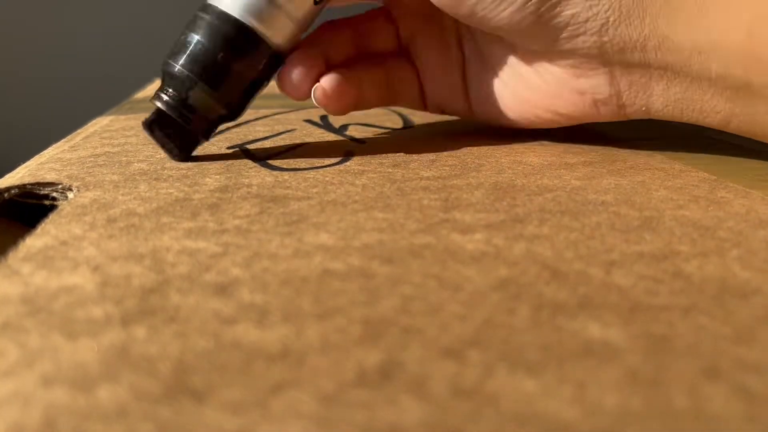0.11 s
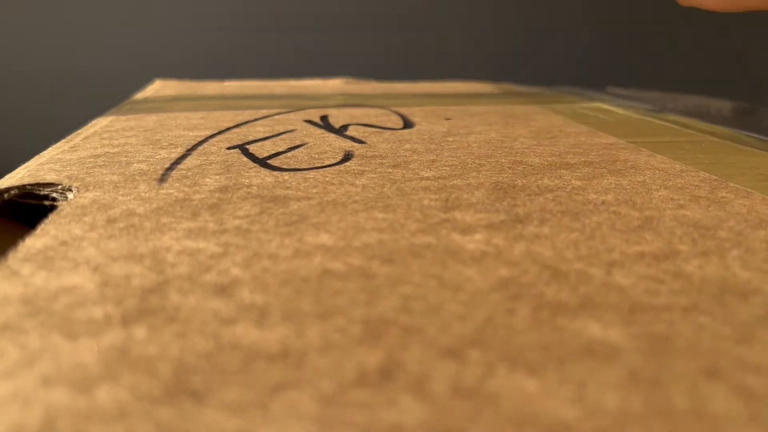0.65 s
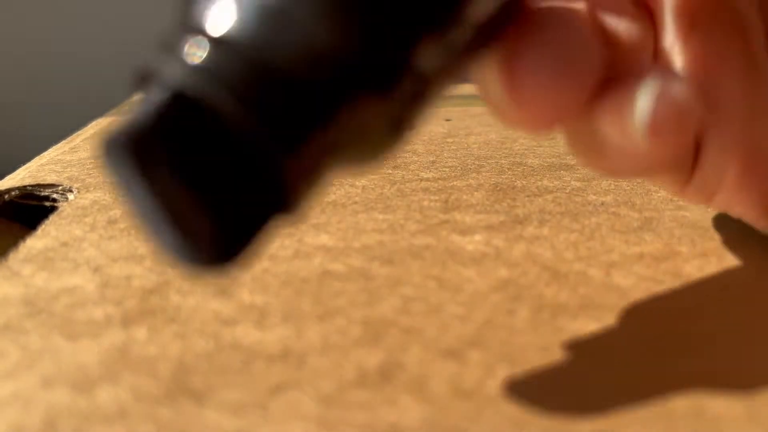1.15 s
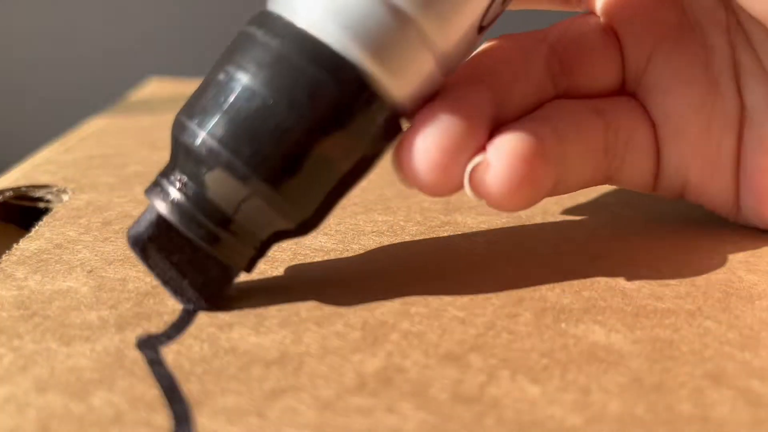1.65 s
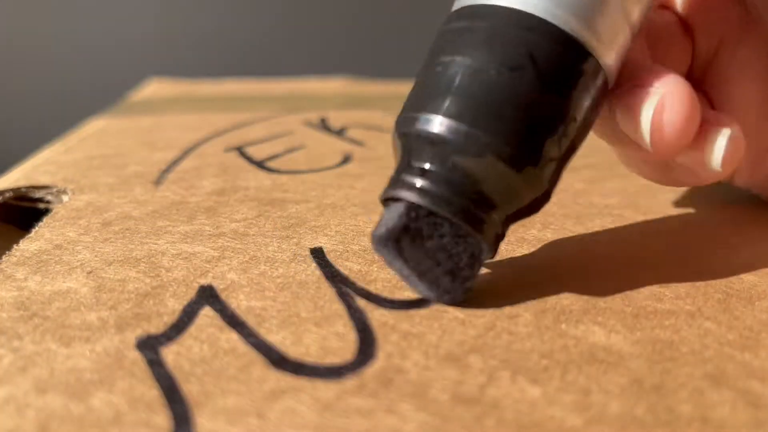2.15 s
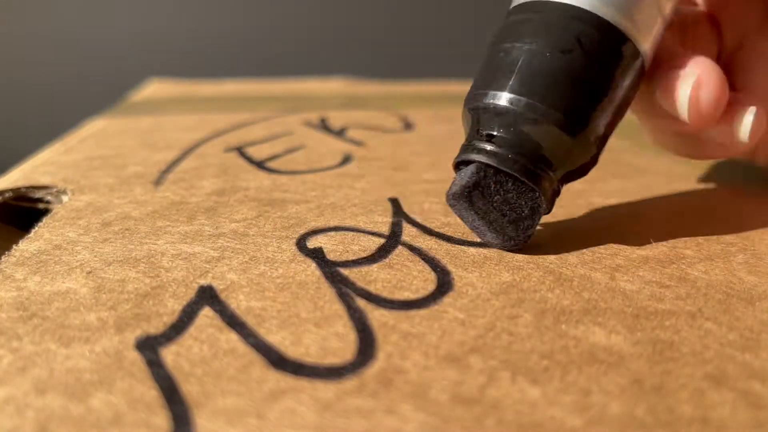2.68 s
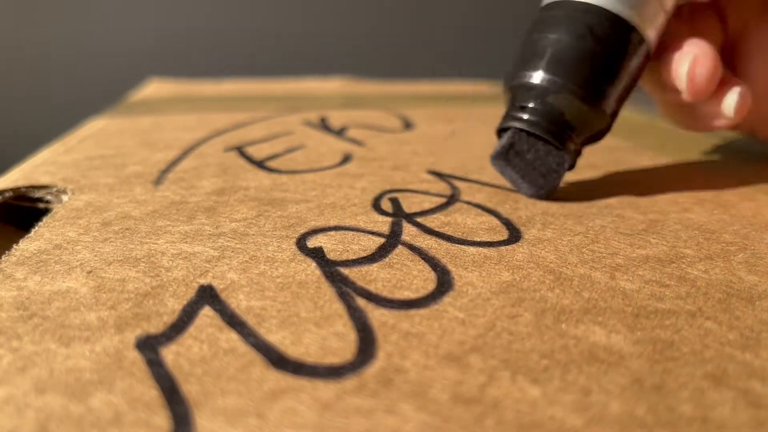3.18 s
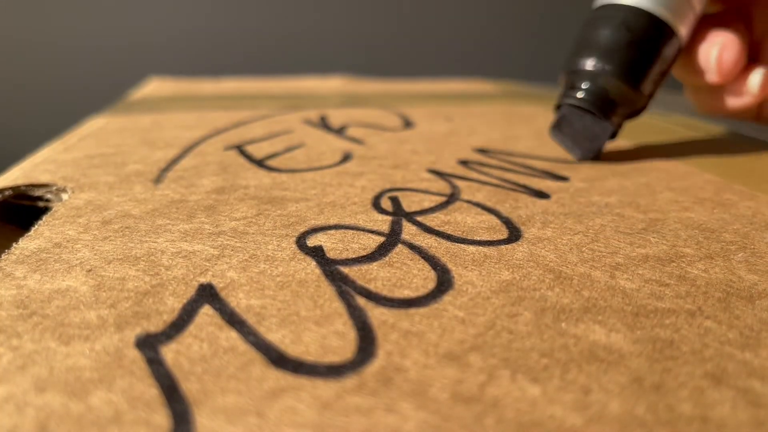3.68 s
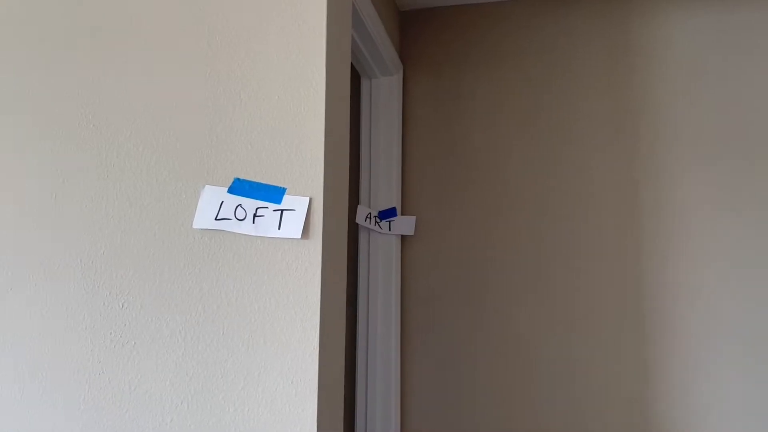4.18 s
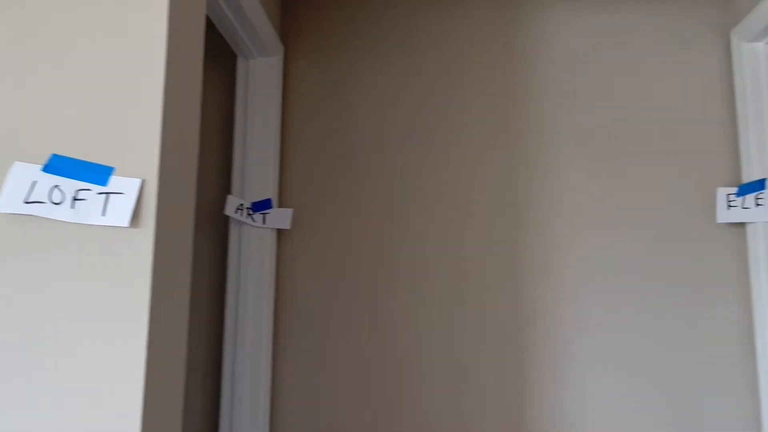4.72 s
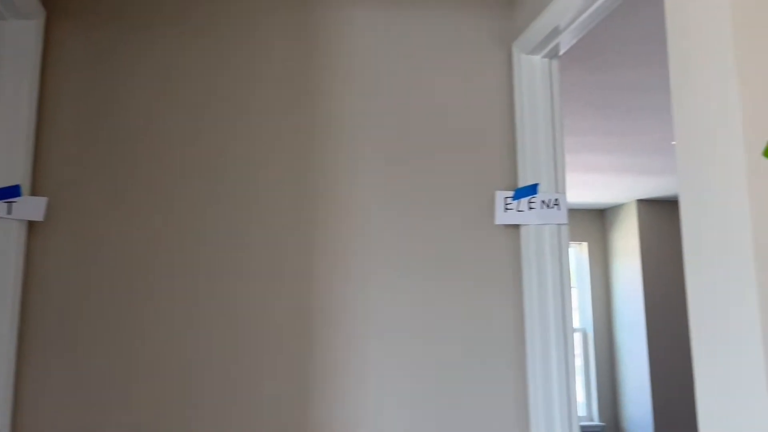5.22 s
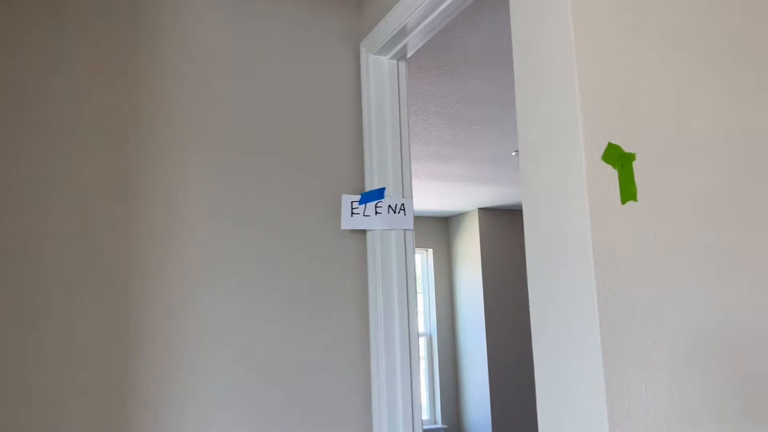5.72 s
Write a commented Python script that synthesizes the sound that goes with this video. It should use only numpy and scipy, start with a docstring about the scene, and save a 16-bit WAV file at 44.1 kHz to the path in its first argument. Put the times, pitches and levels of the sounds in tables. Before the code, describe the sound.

Close stereo pickup beside a hollow cardboard box, with low ventilation rumble and faint drones beneath. At 0.06-0.2 s a fast felt-marker swipe hisses, with a low buzz over the corrugation. A light tap at 0.44 leads to the loudest event, a double, boomy knock with plastic clicks at about 0.52. Soft hand brushes and tiny ticks fill 0.6-1.25. At 1.27 the tip lands with a solid thud, then writes until 3.7: dry, grainy, fibrous strokes of changing pressure, strongest around 1.44, 1.75-1.95 and 2.1, with low panel bumps near 1.74, 2.04, 2.57 and 3.11. Rasp gets thinner and brighter as the tip moves away; short buzzes return around 3.3-3.55. Everything fades by 3.8. A quiet empty room follows, with two faint clicks near 4.7. At about 5.2 a distant, muffled thump swells softly, lingers and decays through the end at about 5.85.

```python
"""In a room with ventilation rumble and drones, a broad felt marker writes on a corrugated cardboard box beside two ports.
The felt's drag is shaped noise that also shakes the panel; little contacts are noise bursts through the barrel's modes;
the tip's buzz over the flutes is a few harmonics at the crossing rate; its landings are falling sweeps on the panel.
The sound fades out; then, in a quiet empty room, two faint clicks use the contacts' noise bursts again,
and a distant thump swells and dies away as four bands of noise."""
import sys
import numpy as np
from scipy import signal
from scipy.fft import rfft, irfft, next_fast_len
from scipy.io import wavfile
from scipy.ndimage import uniform_filter1d, map_coordinates

SR = 44100
rng = np.random.default_rng(int(sys.argv[2]) if len(sys.argv) > 2 else 0)


def natural_amplitude(level_db):
    """Convert a level in decibels to a linear amplitude factor, elementwise."""
    exponent = np.asarray(level_db, float) / 20
    return 10 ** exponent


def wav_out(sig):
    """Save sig, one row per channel (or a flat mono array), as 16-bit PCM at SR to the path in sys.argv[1]."""
    wavfile.write(sys.argv[1], SR, np.round(np.clip(np.atleast_2d(sig).T, -1, 1) * 32767).astype(np.int16))


N = 257984

# Modes of the cardboard panel. Each row: centre in Hz, width in Hz, relative level in dB.
PANEL_MODES = [(92, 84, -6.5), (124, 32, -9), (275, 70.7, -6.5), (383, 160, -7.5), (514.4, 211, -13.5)]
# Air of the two rooms. Each row: time in seconds, first room's level in dB, second room's level in dB.
AIR_LEVELS = [(0, -34, -120), (3.66, -38, -120), (3.74, -52.5, -120), (3.79, -63, -120), (3.797, -120, -74),
              (3.815, -120, -51.5), (5.85, -120, -54)]
# Left-right likeness of near sounds, then of far ones. Each row: frequency in Hz, likeness (1 alike, -1 opposed).
NEAR_LIKENESS = [(60, 0.91), (300, .85), (700, 0.53), (1500, 0.33), (2300, 1), (3600, 0.6), (5000, 0.63),
                 (6500, 0.23)]
FAR_LIKENESS = [(60, 0.98), (300, 0.74), (600, -0.17), (1500, -0.17), (3000, 0.43), (6500, 0.77)]
FIRM_DB = -40.5  # stroke level that counts as firm


def unit(x):
    """Scales to rms 1."""
    return x / np.sqrt(np.mean(x ** 2) + 1e-20)


def along(points, hz):
    """Reads (Hz, value) points on a log frequency axis."""
    f, v = np.transpose(points)
    return np.interp(np.log(hz + 1), np.log(f + 1), v)


def curves(rows):
    """One value per sample for each column after the time."""
    s, *cols = np.transpose(rows)
    return [np.interp(np.arange(N) / SR, s, c) for c in cols]


def wobble(rate):
    """A smooth random curve, rate knots a second."""
    return map_coordinates(rng.standard_normal(int(N * rate / SR) + 4), [np.arange(N) * rate / SR])


def filtered(x, response):
    """Filters x by a complex response of frequency."""
    m = next_fast_len(N + SR // 2)
    return irfft(rfft(x, m) * response(np.fft.rfftfreq(m, 1 / SR)), m)[..., :N]


def resonances(modes):
    """Causal response of (Hz, width, dB) modes, alternating in sign."""
    def response(f):
        total = 0
        for k, (centre, width, db) in enumerate(modes):
            damping = 1j * f * width
            total = total + (-1) ** k * natural_amplitude(db) * damping / (centre * centre - f * f + damping)
        return total
    return response


def twice(modes):
    """The resonances applied twice, for steeper skirts."""
    return lambda hz: resonances(modes)(hz) ** 2


def colour(spectrum):
    """Gain of (Hz, dB) points."""
    return lambda hz: natural_amplitude(along(spectrum, hz))


def rush(response, alike, patchy_db, grain_db=0, lasting_db=0):
    """Stereo noise of rms 1: grainy, with brief wide patches of random gain and narrow lasting ones."""
    # Bands of the treble in which left and right noise become fully alike. Each row: frequency in Hz, likeness.
    alike_bands = [(7600, 1), (9100, 1), (9800, .8), (10900, 1), (13000, 1), (13800, .7), (14500, 1)]
    raw = rng.standard_normal((2, N)) * natural_amplitude(grain_db * wobble(1500))
    z = signal.stft(raw, nperseg=512)[2]

    def field(high, long):
        tall = uniform_filter1d(rng.standard_normal(z.shape[1:]), size=high, axis=0)
        return unit(uniform_filter1d(tall, size=long, axis=1))

    gain_db = patchy_db * field(high=6, long=10) + lasting_db * field(high=2, long=36)
    pair = signal.istft(z * natural_amplitude(gain_db), nperseg=512)[1][:, :N]

    def mid_side(hz):
        angle = np.arccos(np.clip(along(alike + alike_bands, hz), -1, 1)) / 2
        return response(hz) * [np.cos(angle), np.sin(angle)]

    mid, side = filtered(pair, mid_side)
    return unit(np.array([mid + side, mid - side]))


def stroke_gain():
    """The felt's drag on the card, stroke by stroke."""
    # One table a stroke. Each row: time in seconds, level in dB before the layer trims.
    strokes = [
        [(0.056, -58), (0.072, -37), (0.164, -39), (0.188, -60), (0.2, -56)],
        [(1.29, -61), (1.316, -44), (1.352, -44.5), (1.442, -33.5), (1.46, -41), (1.48, -34.5), (1.51, -58)],
        [(1.51, -57), (1.534, -59), (1.546, -47), (1.588, -48), (1.608, -39), (1.698, -45.5), (1.712, -59.5)],
        [(1.712, -60), (1.726, -64), (1.738, -41), (1.76, -35), (1.864, -39.5), (1.9, -35.5), (1.97, -39.5),
         (1.995, -56)],
        [(1.995, -59), (2.027, -66.5), (2.045, -41), (2.089, -35.5), (2.113, -44.5), (2.155, -42.5),
         (2.163, -36.5), (2.3, -42.5)],
        [(2.3, -40), (2.416, -40.5), (2.422, -36.5), (2.508, -43), (2.545, -52)],
        [(2.545, -52.5), (2.565, -53), (2.585, -44), (2.623, -37.5), (2.701, -43), (2.823, -42), (2.839, -39.5),
         (2.9, -43)],
        [(2.9, -39), (2.912, -45), (2.968, -40), (2.978, -44), (3.074, -44), (3.095, -66)],
        [(3.095, -66.5), (3.113, -42), (3.121, -39.5), (3.207, -43), (3.225, -61.5)],
        [(3.225, -58), (3.239, -46.5), (3.267, -38), (3.329, -41.5), (3.36, -52)],
        [(3.36, -52.5), (3.38, -40), (3.408, -39.5), (3.452, -55), (3.455, -50.5)],
        [(3.455, -52.5), (3.485, -41.5), (3.555, -47), (3.565, -54), (3.58, -51.5)],
        [(3.58, -51), (3.598, -45.5), (3.636, -50), (3.672, -59.5), (3.69, -53.5), (3.708, -55), (3.762, -90),
         (3.79, -90)],
    ]
    t = np.arange(N) / SR
    total = sum((t >= rows[0][0]) * (t < rows[-1][0]) * natural_amplitude(curves(rows)[0]) for rows in strokes)
    return (t > strokes[0][0][0]) * total


def brush_gains():
    """Fingers and sleeve brush the card: quick rise, hold, exponential fall; gains of the hiss and of the fizz."""
    # Each row: start in seconds, hiss in dB before trims, hold in seconds, t60 in seconds, fizz in dB over the hiss.
    brushes = [(0, -59, 0.0091, 0.25, 3), (0.27, -57.5, .045, 0.13, -9), (0.614, -53.5, 0.018, 0.47, -2),
               (0.693, -73.5, 0.3, 0.28, -5), (0.818, -64.5, 0.02, 0.063, 1),
               (1.057, -61.5, .04, 0.3, -1.5), (1.196, -60, .045, .1, 1.5), (0.51, -56, .012, .06, -8),
               (.18, -62, .01, .3, 3), (1.261, -54, .012, .08, 3)]
    rise_s = 0.0073
    t, hiss, fizz = np.arange(N) / SR, 0, 0
    for s, db, hold, t60, fizz_db in brushes:
        fall = natural_amplitude(db - 60 * np.clip(t - s - hold, 0, None) / t60)
        gain = fall * np.clip((t - s) / rise_s + (s == 0), 0, 1)  # one at zero is already under way
        hiss = hiss + gain
        fizz = fizz + gain * natural_amplitude(fizz_db)
    return hiss, fizz


def felt():
    """Fibres tear at the felt as hiss and fizz; the card's ring and rasp change as the tip travels."""
    # Hiss spectrum, then fizz spectrum. Each row: frequency in Hz, relative level in dB.
    hiss_spectrum = [(1000, -30.5), (1400, -15), (1800, -5), (2050, -4.5), (2300, -9.5), (2850, -3.5),
                     (3500, -5), (4200, -6.5), (5200, -8), (7000, -5), (8300, -0.5), (10000, -31.5)]
    fizz_spectrum = [(7000, -25.5), (8300, -2), (9500, 1.5), (11000, -3), (12500, -4.5), (15900, -5)]
    # Rasp modes of the card's face, applied twice. Each row: centre in Hz, width in Hz, level in dB, each for one pass.
    rasp_modes = [(693, 670, 0.5), (1034, 530, 3), (1315, 1100, -0.5)]
    # The ringing mode of the card's face, applied twice: centre in Hz, width in Hz for one pass.
    ring_mode = (1824, 400)
    # Each row: time in seconds, ring in dB on the stroke level, fizz and rasp in dB on the firm level,
    # share of the upper rasp mode from 0 to 1.
    face_levels = [(.1, -14.5, 3, -4.5, 0.17), (1.35, -5, 2, 7.5, 0.052), (1.62, -4, 1.1, 1.5, 0.072),
                   (1.9, -5, 2, 4.5, 0.24), (2.15, -0.5, 2.4, 2.5, 0.32), (2.5, -7.5, 3.5, 5, 0.34),
                   (2.535, -6, -10, 3, .3), (2.565, -6, -10, 3, .4), (2.6, -9.5, 3, 1, .45),
                   (2.68, -7, 0, 2.5, 0.54), (2.9, -7.5, 5, 0.5, 0.78), (3.2, -13.5, 1.2, 0.5, 0.8),
                   (3.5, -11, 4.5, 0.5, 0.99), (3.75, -4.5, 0.76, -4.5, 1)]
    fizz_grows, rasp_grows = 1.13, 0.75  # dB gained per dB of stroke
    brush_rasp_db = 10  # over the brush level

    stroke = stroke_gain()
    firm = stroke / natural_amplitude(FIRM_DB)
    brush, brush_fizz = brush_gains()
    ring_db, fizz_db, rasp_db, upper = curves(face_levels)
    drag = natural_amplitude(0.92 * wobble(40))

    hiss = natural_amplitude(3) * drag * rush(colour(hiss_spectrum), NEAR_LIKENESS, patchy_db=2.5, grain_db=1.36, lasting_db=3.0)
    ring = natural_amplitude(ring_db) * rush(twice([(*ring_mode, 0)]), NEAR_LIKENESS, patchy_db=3.5, lasting_db=3.5)

    fizz = natural_amplitude(3.5) * drag * rush(colour(fizz_spectrum), NEAR_LIKENESS, patchy_db=0.5, grain_db=2.0, lasting_db=3.5)
    fizz_gain = natural_amplitude(FIRM_DB + fizz_db) * firm ** fizz_grows + brush_fizz

    low, high = (rush(twice(modes), NEAR_LIKENESS, patchy_db=2.5, grain_db=3.0, lasting_db=3.5)
                 for modes in (rasp_modes[:2], rasp_modes[2:]))
    rasp = np.sqrt(1 - upper) * low + np.sqrt(upper) * high
    rasp_gain = natural_amplitude(FIRM_DB + rasp_db) * firm ** rasp_grows + natural_amplitude(brush_rasp_db) * brush
    return (stroke + brush) * (hiss + ring) + fizz_gain * fizz + rasp_gain * rasp


def panel_shaking():
    """Drag and heavier pushes shake the panel in lumps: noise in its body modes and in the bass."""
    # Bass spectrum of the panel. Each row: frequency in Hz, relative level in dB.
    bass_spectrum = [(20, -24), (40, -4.5), (60, 8), (100, 0), (140, 4), (200, -44.5)]
    # Heavier pushes. Each row: centre in seconds, length in seconds, bass in dB, body in dB, before random lumps.
    shoves = [(0.005, 0.094, -23, -38), (0.096, 0.039, -20.5, -32.5), (0.142, 0.065, -26, -20.5),
              (0.282, .06, -33, -44.5), (0.568, .08, -31.5, -40), (1.31, .04, -30, -39),
              (1.797, 0.11, -26.5, -33.5), (1.952, .08, -28, -36), (2.226, 0.055, -29.5, -39.5),
              (2.46, 0.068, -28, -35.5), (2.652, .1, -24.5, -32), (2.81, 0.12, -30, -50),
              (2.983, 0.23, -32.5, -44.5), (3.162, 0.099, -24, -34.5), (3.618, 0.02, -26.5, -49.5)]
    body_db, body_grows, bass_db = -33.5, 0.3, -42  # body at a firm stroke, its dB per dB of stroke, steady bass
    t = np.arange(N) / SR
    fade = natural_amplitude(curves(AIR_LEVELS)[0] - AIR_LEVELS[0][1])
    firm = stroke_gain() / natural_amplitude(FIRM_DB)
    bass_push, body_push = sum(natural_amplitude([[low_db], [high_db]]) * np.exp(-(2 * (t - s) / length) ** 4)
                               for s, length, low_db, high_db in shoves)
    body_gain = (natural_amplitude(body_db) * firm ** body_grows * fade + body_push) * natural_amplitude(2.9 * wobble(60))
    bass_gain = (natural_amplitude(bass_db) * fade + bass_push) * natural_amplitude(2.0 * wobble(28))
    body = body_gain * rush(resonances(PANEL_MODES[2:]), NEAR_LIKENESS, patchy_db=0.66)
    return body + bass_gain * rush(colour(bass_spectrum), NEAR_LIKENESS, patchy_db=2.75)


def air():
    """Ventilation rumble and swelling narrow drones in the first room, still air in the second."""
    # Spectra of the first and the second room. Each row: frequency in Hz, relative level in dB.
    first_spectrum = [(15, -38.5), (25, -8), (91, -9.5), (157, -7.5), (284, -14), (562, -19), (819, -25),
                      (1660, -36.5), (2000, -42), (7000, -58), (10000, -77.5), (15900, -68)]
    second_spectrum = [(15, -44), (25, -14), (76, -3), (173, -17), (264, -20), (523, -29), (800, -26),
                       (1300, -30), (1910, -33), (2200, -36), (3000, -43), (5000, -47), (7000, -57),
                       (10000, -64), (15900, -80)]
    # Drones. Each row: pitch in Hz, width in Hz, swollen level in dB before the fade, swell's start and end in seconds.
    drone_rows = [(124, 4.65, -37.5, 0.59, 2.2), (284.6, 5, -39.5, 2.3, 3.65), (1560, .58, -63.5, .5, 1.04)]
    rest_db = -9  # outside the swell
    first_db, second_db = curves(AIR_LEVELS)
    t = np.arange(N) / SR
    drones = 0
    for hz, width, db, a, b in drone_rows:
        swollen = uniform_filter1d(1. * (t > a) * (t < b), size=SR // 10)
        level = natural_amplitude(db + rest_db * (1 - swollen) + 1.5 * wobble(width))
        phase = 2 * np.pi * np.cumsum(hz + .3 * width * wobble(width)) / SR
        drones = drones + level * np.sqrt(2) * np.sin(phase)
    first = natural_amplitude(first_db) * rush(colour(first_spectrum), FAR_LIKENESS, patchy_db=0.73)
    second = natural_amplitude(second_db) * rush(colour(second_spectrum), FAR_LIKENESS, patchy_db=0.3, lasting_db=1)
    return first + natural_amplitude(first_db - AIR_LEVELS[0][1]) * drones + second


def ticks():
    """Short crackles through three groups of modes, low, middle and high, each tick exciting them by its own shares."""
    # Little contacts of the marker; the last two rows are faint clicks in the second room.
    # Each row: time in seconds, level in dB, dull and bright parts in dB over it, t60 in seconds;
    # the levels are before the group trims.
    tick_rows = [(0.0703, -24, -10, -11, 0.0053), (0.2798, -44, -10, -25, 0.0044),
                 (0.328, -42.5, 3, -35, 0.015), (0.392, -49, 10.5, -35, 0.013),
                 (0.436, -26, 3.5, -43, 0.011), (0.5104, -37, 11, -15.5, 0.0082),
                 (0.5158, -35.5, -2, -13.5, 0.018), (0.5284, -40, 21, -16.5, 0.014),
                 (0.615, -53, -19, -11, 0.013), (0.6394, -50, 14, -20, 0.016),
                 (0.826, -40.5, -5, -14.5, 0.013), (0.843, -45, 8.5, -12, 0.0095),
                 (1.0141, -49.5, 10, -30, 0.014), (1.033, -51, -16, -30, 0.011),
                 (1.206, -45.5, -18, -8.5, 0.0066), (1.2675, -33, 2.5, -7.5, 0.011),
                 (2.5244, -40.5, 4.5, -13, 0.013), (4.71, -62, -25, -30, .012),
                 (4.736, -59, -25, -30, .012)]
    # Modes of the marker's plastic barrel, lent to the late clicks too, applied twice.
    # Each row: centre in Hz, width in Hz, level in dB, each for one pass.
    barrel_modes = [(1060, 2500, 3.5), (2500, 1900, -0.5), (3690, 680, 2), (6040, 1200, -1),
                    (10330, 6700, 6.5)]
    gates, t = np.zeros((3, N + SR)), np.arange(SR // 10) / SR
    for s, db, dull_db, bright_db, t60 in tick_rows:
        burst = natural_amplitude(db - 60 * t / t60)
        gates[:, round(s * SR):][:, :len(t)] += burst * natural_amplitude([[dull_db + 6.5], [4], [bright_db + 4.0]])
    crackle = rush(np.ones_like, NEAR_LIKENESS, patchy_db=1)
    groups = barrel_modes[:2], barrel_modes[2:4], barrel_modes[4:]
    return sum(filtered(gate[:N] * crackle, twice(group)) for gate, group in zip(gates, groups))


def flutes():
    """Across the corrugation the tip bumps once a flute: a buzz whose pitch is the pen's speed."""
    # A fast swipe. Each row: time in seconds, flutes a second in Hz, level in dB before the trim.
    swipe = [(.085, 99.74, -25), (.096, 109.7, -9.5), (0.105, 177, -3.5), (.118, 218.7, 2),
             (0.134, 218.7, -2.5), (0.147, 200.5, -13), (.16, 190, -5), (0.175, 181.2, -29.5)]
    # Slower crossings. Each row: start, peak and end in seconds, flutes a second in Hz, peak in dB before the trim.
    crossings = [(1.915, 1.933, 2, 80, -24), (2.07, 2.092, 2.11, 79, -16.5), (3.295, 3.304, 3.39, 90, -17),
                 (3.385, 3.429, 3.442, 91, -11), (3.512, 3.522, 3.586, 98, -16)]
    # Harmonics of the buzz. Each row: multiple of the flute rate, level in dB.
    overtones = [(1, 0), (2, -14), (3, -24.5)]
    edge_db = -22  # ends of a crossing under its peak
    swipe_lead, crossing_lead = .59, 0.117  # radians of the flute cycle by which the left port leads
    out, t = np.zeros((2, N)), np.arange(N) / SR
    buzzes = [(swipe_lead, swipe)]
    for a, peak, b, hz, db in crossings:
        late = (peak + 2 * b) / 3
        rows = [(a, hz, db + edge_db), (peak, hz, db), (late, hz, db + edge_db / 3), (b, hz, db + edge_db)]
        buzzes.append((crossing_lead, rows))
    for lead, rows in buzzes:
        hz, db = curves(rows)
        phase = 2 * np.pi * np.cumsum(hz * (1 + .03 * wobble(60))) / SR + np.array([[lead / 2], [-lead / 2]])
        buzz = sum(natural_amplitude(level) * np.sin(k * phase) for k, level in overtones)
        out += (t > rows[0][0]) * (t < rows[-1][0]) * natural_amplitude(db + 2 + .8 * wobble(99)) * buzz
    return out


def knocks():
    """Bending waves run faster in the treble, so each blow arrives as a falling sweep and leaves the panel ringing."""
    # Blows. Each row: time in seconds, level in dB before the trim, first and last pitch in Hz, t60 in seconds.
    blows = [(0.436, -17.5, 506, 200, 0.046), (0.5172, 4, 224, 105, 0.058), (0.524, 9, 130, 89.5, 0.072),
             (1.269, -1.5, 348, 80, 0.069), (1.735, -13.5, 400, 100, .085), (2.039, -12, 398, 90, .07),
             (2.571, -16.5, 313, 85, .07), (3.109, -22.5, 302, 120, 0.051)]
    glide_s, sharp_hz = .0082, 380  # blows that start below sharp_hz glide for less long
    out, t = np.zeros(N + SR), np.arange(SR // 2) / SR
    for s, db, first_hz, last_hz, t60 in blows:
        glide = glide_s * min(1, first_hz / sharp_hz) ** 0.3
        hz = last_hz + (first_hz - last_hz) * np.exp(-(t / glide) ** 2)
        size = natural_amplitude(db + 4.0 - 60 * t / t60) * (1 - np.exp(-(t / 0.0036) ** 2))
        out[round(s * SR):][:len(t)] -= size * np.sin(2 * np.pi * np.cumsum(hz) / SR)
    return out[:N] + natural_amplitude(-16.5) * filtered(out[:N], resonances(PANEL_MODES))


def thump():
    """A far blow heard only as the empty room's answer: each band swells, holds and falls at its own pace."""
    # Middle, bass, treble and top bands. Each row: start in seconds, peak in dB, rise in seconds, hold in seconds,
    # fall in dB a second.
    band_rows = [(5.18, -33.5, .055, 0.26, 29.5), (5.165, -29.5, .06, 0.1, 49),
                 (5.19, -45.5, .035, .15, 30), (5.19, -56, .035, .05, 55)]
    # Spectrum of the thump. Each row: frequency in Hz, relative level in dB.
    boom_spectrum = [(15, -38), (25, -2.5), (48, 3), (91, -9.5), (185, -1), (290, -7.5), (420, -12),
                     (600, -6.5), (800, -5), (1050, -11), (1400, -13.5), (2250, -17), (2600, -21.5),
                     (7000, -33.5), (10000, -38.5), (15900, -54)]
    t = np.arange(N) / SR

    def band(lo, hi):
        def response(hz):
            low, high = (hz / lo) ** 4, (hz / hi) ** 4
            return natural_amplitude(along(boom_spectrum, hz)) * np.sqrt(low / (1 + low) / (1 + high))
        return response

    bands = band(440, 4240), band(0.96, 490), band(2650, 7500), band(8500, SR)
    out = 0
    for (s, db, rise, hold, fall_db), shape in zip(band_rows, bands):
        fall = natural_amplitude(db - fall_db * np.clip(t - s - rise - hold, 0, None))
        swell = np.clip((t - s) / rise, 0, 1) ** 2
        out = out + fall * swell * rush(shape, FAR_LIKENESS, patchy_db=0.6, lasting_db=1.5)
    return out


def scene():
    """Every layer summed, ahead of the two ports."""
    return felt() + panel_shaking() + air() + ticks() + flutes() + knocks() + thump()


def top_cut(x):
    """Nothing passes above the cut-off."""
    return signal.sosfilt(signal.butter(12, 15400, fs=SR, output="sos"), x)


def record(dry):
    """Left and right differ in level and, by the ports up to 6.5 kHz, in phase; the loudest blows clip."""
    # Phase between the ports. Each row: frequency in Hz, radians by which the left leads.
    port_phase = [(100, -0.13), (430, 0.71), (1100, -0.31), (2200, -0.81), (3000, 0.84), (5000, -0.56),
                  (6500, 0.83)]
    # Above the ports' own phase the treble sits on plateaus, opposed or alike in turn.
    # Each row: frequency in Hz, radians by which the left leads.
    treble_plateaus = [(7700, -np.pi), (9000, -np.pi), (10900, -2 * np.pi), (13000, -2 * np.pi),
                       (14500, -3 * np.pi)]
    # Level between the ports. Each row: frequency in Hz, left minus right in dB.
    port_lean = [(60, 0.5), (200, 0), (370, 0.5), (680, 4), (1260, -2.5), (2310, 1), (4250, 3.5), (6000, 2)]
    half = np.array([[.5], [-.5]])  # each side takes half the difference

    def response(hz):
        gain = natural_amplitude(half * along(port_lean + [(7500, 0)], hz))
        return gain * np.exp(1j * half * along(port_phase + treble_plateaus, hz))

    ports = filtered(dry, response)
    clipped = ports / (1 + np.abs(ports) ** 12) ** (1 / 12)
    return top_cut(clipped)


dry = scene()
out = record(dry)
wav_out(out)
```